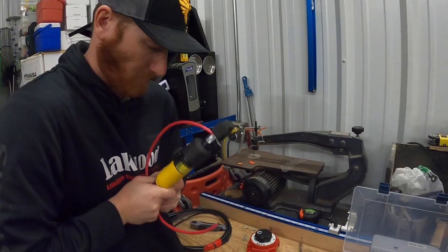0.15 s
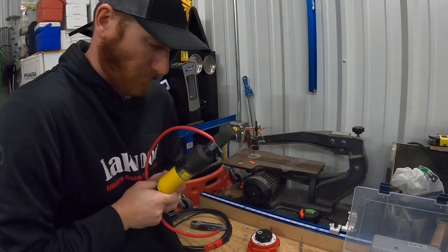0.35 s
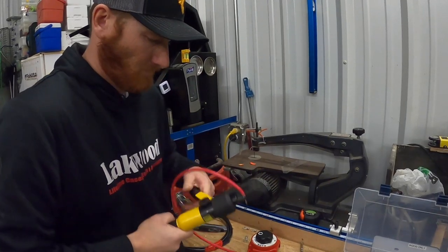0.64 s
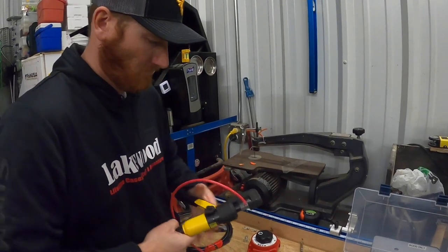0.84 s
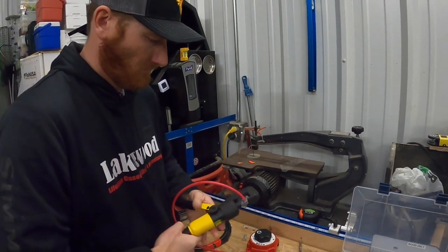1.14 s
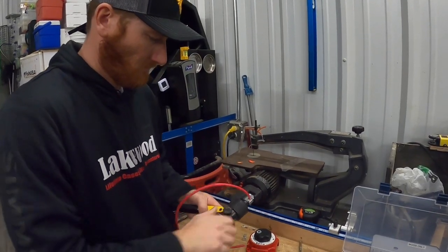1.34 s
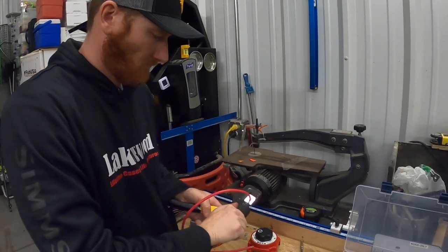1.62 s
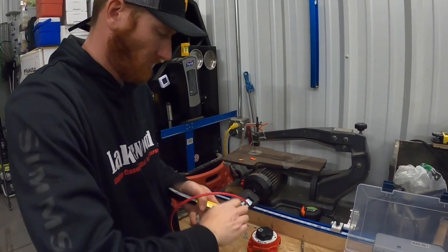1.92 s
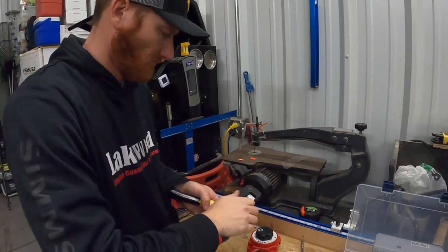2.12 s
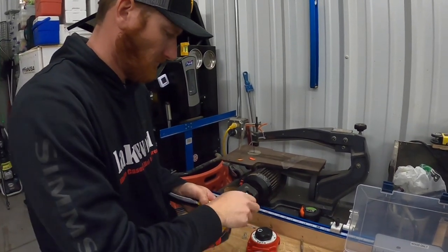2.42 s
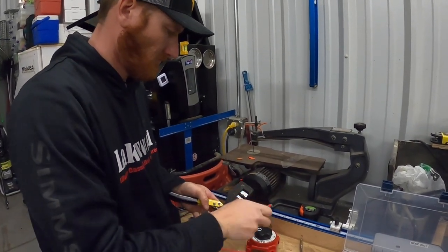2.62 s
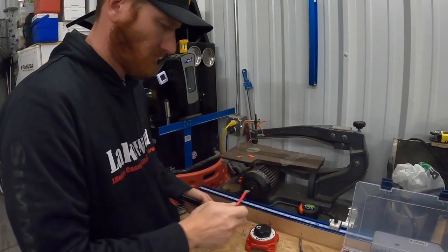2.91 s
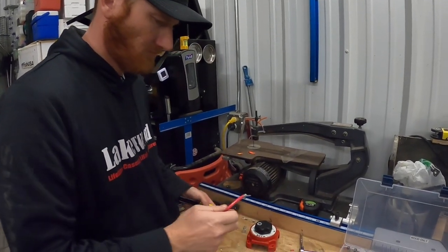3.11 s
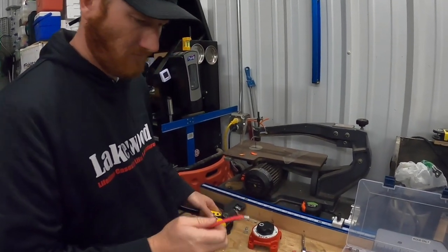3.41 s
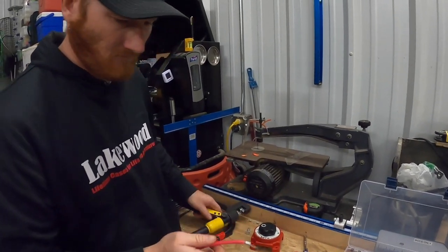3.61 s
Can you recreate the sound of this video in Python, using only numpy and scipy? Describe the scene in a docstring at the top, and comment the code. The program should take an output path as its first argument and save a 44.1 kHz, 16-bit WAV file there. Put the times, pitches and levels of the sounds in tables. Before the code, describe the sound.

A hydraulic crimper's loose head clicks and rattles, then clanks sharply; its valve releases a short squeaky hiss, followed by tool and cable knocking and sliding on a wooden bench. Close microphone in a ringing metal shed.

```python
"""A quiet hum of air in a sheet-metal workshop, then the clicks, loose rattle and clanks of a hand-held
hydraulic crimper: its steel head is a bank of decaying modes, struck by a contact and fading chatter.
The release valve hisses with fluttering noise, squeaks with a gliding sine and ticks with short sines.
Tool and cable knock and slide on the wooden bench, whose modes are driven by blows and dense grains.
The shed rings on after every blow as scattered noise and a tail that fades band by band."""
import sys
import numpy as np
from scipy import signal
from scipy.fft import rfft, irfft
from scipy.io import wavfile
from scipy.ndimage import uniform_filter1d

SR = 44100
rng = np.random.default_rng(int(sys.argv[2]) if len(sys.argv) > 2 else 0)


def volts_from_db(level):
    """Convert decibel levels to linear amplitude ratios."""
    exponent = np.asarray(level, float) / 20
    return 10 ** exponent


def transcribe(u):
    """Save the signal u as a 16-bit wav file named by the first command-line argument.

    u: samples, shape (n,) or (channels, n), limited to [-1, 1]; the rate is SR.
    q: integer samples, one column per channel.
    """
    v = np.clip(np.atleast_2d(u).T, -1, 1)
    q = np.round(v * 32767).astype(np.int16)
    wavfile.write(sys.argv[1], SR, q)


N = 165375


def table_at(hz, table):
    """Value of (frequency [Hz], value) points on a log-frequency axis."""
    points = np.array(table, float)
    return np.interp(np.log(np.maximum(hz, 1)), np.log(points[:, 0]), points[:, 1])


def unit(x):
    """Scaled to rms 1."""
    return x / np.sqrt(np.mean(x ** 2) + 1e-18)


def wander(samples):
    """Slow random curve of rms 1: noise averaged over a number of samples."""
    return unit(uniform_filter1d(rng.standard_normal(N), size=samples))


def fader(t, times, db):
    """Gain that rides straight lines between dB points, -120 dB outside them."""
    return volts_from_db(np.interp(t, times, db, left=-120, right=-120))


def colour(x, table):
    """Filter by a (frequency [Hz], level [dB]) spectrum, then scale to rms 1."""
    gain = volts_from_db(table_at(np.fft.rfftfreq(len(x), 1 / SR), table))
    return unit(irfft(rfft(x) * gain, len(x)))


def band(x, lo_hz, hi_hz):
    """Causal band-pass."""
    return signal.sosfilt(signal.butter(3, [lo_hz, hi_hz], "band", fs=SR, output="sos"), x)


def body(modes, width_hz, share, crack_db, spots_hz=(), shift=0):
    """Ring of an object: decaying sines plus the bare contact; the struck spot favours nearby modes."""
    spot_db, spot_octaves = 24, 0.13
    t = np.arange(SR // 10) / SR
    hz, db = np.array(modes, float).T[:, :, None]
    db = db + sum(spot_db * np.exp(-(np.log2(hz / spot) / spot_octaves) ** 2) for spot in spots_hz)
    hz = hz * (1 + shift * rng.standard_normal(hz.shape))
    width = width_hz + share * hz  # a wider resonance dies sooner
    sign = (-1) ** np.arange(len(hz))[:, None]
    decay = np.exp(-np.pi * width * t)
    ring = np.sum(sign * volts_from_db(db) * width * decay * np.sin(2 * np.pi * hz * t), axis=0)
    ring = ring / np.sqrt(np.sum(ring ** 2))
    ring[0] += volts_from_db(crack_db)  # broad contact noise beside the modes
    return ring


def blows(events, edges, order, ring, chatter_ms):
    """Each blow is a first contact and fading chatter; its ring is weighted band by band."""
    chatter_per_ms, chatter_db, contact_ms = 6, 3, 1
    out, t = np.zeros(N + SR), np.arange(SR // 20) / SR
    for row in events:
        u = rng.random((2, len(t)))
        hits = (u[0] < chatter_per_ms * 1000 / SR) * (u[1] - .5)
        push = hits * volts_from_db(chatter_db) * np.exp(-t * 1000 / chatter_ms)
        push = push * np.minimum(t * 1000 / contact_ms, 1)
        push[0] = .6  # first contact
        sound = signal.fftconvolve(push, ring(row))
        at = int(row[0] * SR)
        for k, col in enumerate(order):
            part = band(sound, edges[k], edges[k + 1])
            peak = np.sqrt(uniform_filter1d(part ** 2, size=180).max())  # loudest 4 ms
            out[at:at + len(part)] += part * volts_from_db(row[col]) / peak
    return out[:N]


# spectrum of the hum, relative: (frequency [Hz], level per Hz [dB])
AIR_SPECTRUM = [(25, -28.5), (49, -0.5), (81, -7.5), (106, 5), (163, -1.5), (462, -15), (1210, -6),
                (2430, -15), (12100, -40), (15000, -74)]


def air():
    """Steady hum of the shed: coloured noise, wavering a little."""
    level_db = -59 + 0.33 * wander(SR // 6)
    return colour(rng.standard_normal(N), AIR_SPECTRUM) * volts_from_db(level_db)


# modes of the steel head, relative: (frequency [Hz], resonance height [dB])
STEEL_MODES = [(1066, -10), (1830, -17.5), (2640, -14), (3180, -6), (3770, 0), (4030, -5.5), (4480, 3),
               (5160, -8.5), (5900, -9.5), (6540, -18), (7000, -5.5), (7700, -14), (8400, -21.5),
               (10930, -21)]


def steel(width_hz, spots_hz=()):
    """Ring of the steel head; a greater width means heavier damping."""
    return body(STEEL_MODES, width_hz, share=.013, crack_db=-4, spots_hz=spots_hz)


def held_head(events):
    """Dry blows on the head while the hand damps its modes."""
    return blows(events, (1000, 6000, 13500), order=(1, 2),
                 ring=lambda row: steel(350, row[-1:]), chatter_ms=5)


# small dry clicks of the loose head:
# (time [s], peak level 1-6 kHz [dB], peak level above [dB], pitch the struck spot favours [Hz])
HEAD_CLICKS = [(0.5566, -31.5, -41, 4870), (0.5922, -28.5, -43.5, 1770), (0.6755, -33.5, -52.5, 2630),
               (0.685, -34, -54, 2580), (0.7233, -50, -59, 5220), (1.0735, -29, -54, 4600),
               (1.2479, -36.5, -50.5, 1130), (1.7377, -46.5, -67.5, 4877), (2.163, -28, -44, 1720),
               (3.2988, -42.5, -76.5, 1230), (3.6013, -38, -67, 4310), (3.6177, -45.5, -65, 3160),
               (3.7255, -48.5, -75, 3510)]


def clicks():
    """Loose head clicking, each click favouring the modes of its own struck spot."""
    return held_head(HEAD_CLICKS)


# decay of the shed: (frequency [Hz], T60 [s])
SHED_DECAY = [(200, 0.23), (1500, 1), (4000, 1), (8000, 0.83), (14000, 0.38)]


def shed(x):
    """Early scatter from the bench, then a diffuse tail that fades band by band."""
    tail_db, first_wall_s, early_db, early_t60_s = -16, 0.0034, -9, 0.28
    t = np.arange(SR) / SR
    tail = 0
    for hz in 60 * 2. ** np.arange(9):  # octave bands
        if hz < 15500:
            noise = unit(band(rng.standard_normal(SR), hz / np.sqrt(2), hz * np.sqrt(2)))
            tail = tail + noise * np.sqrt(hz) * volts_from_db(-60 * t / table_at(hz, SHED_DECAY))
    tail = tail * np.clip(t / first_wall_s - 1, 0, 1)
    early = rng.standard_normal(SR) * volts_from_db(-60 * t / early_t60_s) * (t > .002)
    both = volts_from_db(tail_db) * unit(tail) + volts_from_db(early_db) * unit(early)
    return signal.fftconvolve(x, both / np.sqrt(SR))[:N]


def rattle():
    """Faint loose rattle between the clicks: 24 tiny blows on the held head, crowded towards the start."""
    from_s, to_s, level_db = .56, .79, -46
    events = [(from_s + (to_s - from_s) * a ** 2, level_db - 8 * b, level_db - 22, 1800 + 3400 * c)
              for a, b, c in rng.random((24, 3))]
    return held_head(events)


# free clanks of the steel head:
# (time [s], peak level 1.5-6 kHz [dB], peak level below [dB], peak level above [dB])
HEAD_CLANKS = [(.9705, -61.5, -33, -42.5), (.9745, -14.5, -29, -25.5), (.978, -8, -36, -21.5),
               (.9815, -20.5, -27, -33)]


def clanks():
    """Head ringing freely: narrow, lightly damped modes and very short chatter."""
    return blows(HEAD_CLANKS, (500, 1500, 6000, 13500), order=(2, 1, 3),
                 ring=lambda row: steel(80), chatter_ms=1.2)


# modes of the bench top and loose parts on it, relative: (frequency [Hz], resonance height [dB])
BENCH_MODES = [(125, -0.5), (175, 0), (255, 7), (330, 4), (430, -5.5), (565, 2), (670, -9.5), (840, 6),
               (970, 2.5), (1100, -0.5), (1230, 1), (1380, -5), (1620, -2.5), (1830, -4.5), (2300, -1),
               (2680, 1), (3350, -34.5), (3950, -37), (4820, -40)]


def bench(spots_hz=()):
    """Heavily damped ring of the bench top; its modes move a little with what lies on it."""
    return body(BENCH_MODES, 30, share=.095, crack_db=-11, spots_hz=spots_hz, shift=.02)


# duller knocks of tool and cable, mostly on the bench:
# (time [s], peak level 450-1500 Hz [dB], below [dB], 1.5-4 kHz [dB], above 4 kHz [dB],
#  thud pitch [Hz], knock pitch [Hz])
BENCH_KNOCKS = [(1.076, -39.5, -73, -63, -39, 473, 1110), (2.166, -26.5, -25, -31, -39, 241, 900),
                (2.186, -14, -30.5, -25, -38, 330, 1696), (2.271, -22.5, -19.5, -32.5, -72, 296, 510),
                (2.304, -32.5, -24, -54, -79, 327, 476), (2.355, -28, -32.5, -44, -71.5, 304, 840),
                (2.541, -24, -34, -20, -23, 250, 960), (2.565, -15.5, -22.5, -23, -34, 282, 521),
                (2.585, -26, -39, -25, -70, 271, 911), (2.657, -13, -31.5, -16.5, -66, 395.6, 625),
                (2.787, -36, -42, -61, -72, 430, 744), (2.887, -17, -20, -10, -55, 565, 1195),
                (2.899, -33, -26.5, -30.5, -30, 565, 1336), (2.919, -26, -22.5, -36.5, -58.5, 204, 1390),
                (3.186, -21, -21, -43.5, -76, 210, 604), (3.202, -27, -17, -55, -82, 178.6, 655),
                (3.272, -7.5, -14.5, -45, -68, 263.5, 553), (3.333, -20.5, -28, -61.5, -71.5, 392, 557),
                (3.355, -12.5, -26.5, -35.5, -75, 463, 672), (3.513, -19.5, -20, -35, -63, 283, 830),
                (3.522, -21, -22, -42.5, -76, 255, 993), (3.668, -37.5, -60, -61, -67, 241.5, 914),
                (3.685, -30.5, -36, -41.5, -82, 245, 560)]


def knocks():
    """Blows on the bench, each favouring the modes near its thud and knock pitches."""
    return blows(BENCH_KNOCKS, (100, 450, 1500, 4000, 8000), order=(2, 1, 3, 4),
                 ring=lambda row: bench(row[-2:]), chatter_ms=4)


# oil jet through the valve: (time [s], flutter rate [Hz], hiss level [dB])
OIL_JET = [(1.974, 878, -64), (1.989, 868, -37.5), (2.005, 944, -41), (2.033, 834, -25.5),
           (2.048, 854, -36.5), (2.092, 792.5, -40), (2.132, 688, -45), (2.211, 635, -58.5),
           (2.229, 610, -68)]
# spectrum of the hiss, relative: (frequency [Hz], level per Hz [dB])
HISS_SPECTRUM = [(880, -10), (2500, -14), (5180, -3.5), (8400, -10), (9500, -10), (12500, -18),
                 (15500, -52)]


def oil_jet(t):
    """Hiss of noise and flutter harmonics, flickering band by band, with the flutter as a faint tone."""
    flutter_db, jitter, flutter_from_s, flutter_rise_s = 2, .005, 2.04, .03
    patch_db, tone_db = 1.5, -8
    times, rate_hz, level_db = np.array(OIL_JET).T
    turns = np.cumsum(np.interp(t, times, rate_hz) * (1 + jitter * wander(200))) / SR
    flutter = sum(volts_from_db(3 * wander(900)) * np.cos(2 * np.pi * k * turns + k * k) for k in range(4, 17))
    flutter = unit(flutter) * np.clip((t - flutter_from_s) / flutter_rise_s, 0, 1)
    hiss = colour(rng.standard_normal(N) + volts_from_db(flutter_db) * flutter, HISS_SPECTRUM)
    edges = 700 * 2 ** (np.arange(19) / 4)  # quarter octaves [Hz]
    hiss = unit(sum(band(hiss, lo, hi) * volts_from_db(patch_db * wander(700))
                    for lo, hi in zip(edges, edges[1:])))
    tone = volts_from_db(tone_db) * np.sin(2 * np.pi * turns) * (t > flutter_from_s)
    return (hiss + tone) * fader(t, times, level_db)


# valve squeak: (time [s], pitch [Hz], level [dB])
VALVE_SQUEAK = [(1.981, 658, -73), (1.992, 600, -34), (2.001, 902, -48.5), (2.014, 893, -35.5),
                (2.031, 575, -27), (2.042, 466, -25.5), (2.097, 479, -41), (2.125, 493, -70)]


def squeak(t):
    """Gliding sine, its pitch and level drawn through the table."""
    times, hz, level_db = np.array(VALVE_SQUEAK).T
    phase = 2 * np.pi * np.cumsum(np.interp(t, times, hz)) / SR
    tone = np.sqrt(2) * fader(t, times, level_db) * np.sin(phase)
    return uniform_filter1d(tone, size=9)  # softens the corners


# valve stem ticks: (time [s], pitch [Hz], level [dB], T60 [s])
STEM_TICKS = [(1.983, 1430, -38, .035), (2.021, 1450, -36, .035), (1.986, 5900, -40, .03),
              (2.022, 5150, -30, .06)]


def stem_ticks(t):
    """Ticks of the valve stem: fast-fading sines with a 0.43 ms onset."""
    out = np.zeros(N)
    for at, hz, db, t60 in STEM_TICKS:
        age = np.maximum(t - at, 0)
        envelope = volts_from_db(db - 60 * age / t60) * np.minimum(age / 0.00043, 1)
        out += envelope * np.sin(2 * np.pi * hz * age)
    return out


# sliding on the bench: (time [s], level 55-454 Hz [dB], level 405-1900 Hz [dB])
BENCH_SLIDE = [(2.158, -39, -33.5), (2.23, -39, -37.5), (2.328, -43.5, -41.5), (2.41, -44.5, -49.5),
               (2.49, -38.5, -41.5), (2.601, -52.5, -52), (3.15, -70, -62.5), (3.229, -30, -53),
               (3.402, -39.5, -54), (3.489, -58, -50.5), (3.581, -42.5, -47.5), (3.75, -49, -55.5)]


def slide(t):
    """Dense uneven grains rumble through the bench top."""
    grains_per_s = 1000
    times, low_db, high_db = np.array(BENCH_SLIDE).T
    grains = (rng.random(N) < grains_per_s / SR) * rng.standard_normal(N)
    grains = grains * volts_from_db(2 * rng.exponential(size=N))
    rumble = signal.fftconvolve(grains, bench())[:N]
    low = fader(t, times, low_db) * unit(band(rumble, 55, 454))
    high = fader(t, times, high_db) * unit(band(rumble, 405, 1900))
    return low + high


def scene():
    """All sources close by, the shed's answer to them, and the air."""
    t = np.arange(N) / SR
    contacts = clicks() + rattle() + clanks() + knocks() + slide(t)
    valve = oil_jet(t) + squeak(t) + stem_ticks(t)
    near = band(contacts, 60, 11500) + valve
    return (near + shed(near) + air())[None]


def low_pass(x):
    """Removes everything above the highest recorded frequency."""
    return signal.sosfilt(signal.butter(12, 15620, fs=SR, output="sos"), x)


def record(dry):
    """Softly rounds the loudest peaks of the mix."""
    mix = 2 * np.tanh(dry / 2)
    return low_pass(mix)


dry = scene()
out = record(dry)
transcribe(out)
```